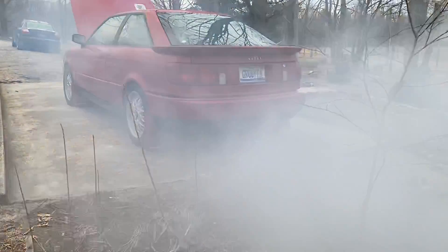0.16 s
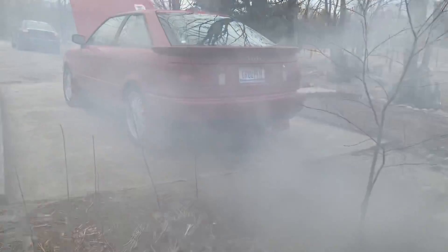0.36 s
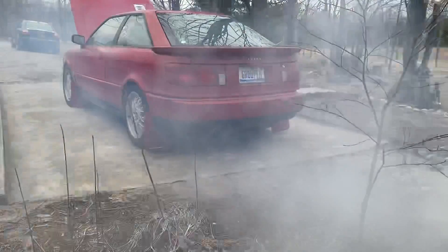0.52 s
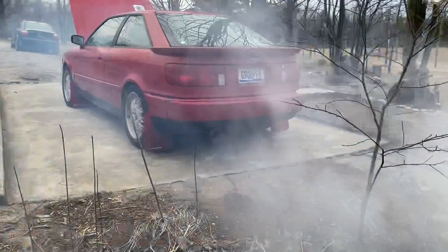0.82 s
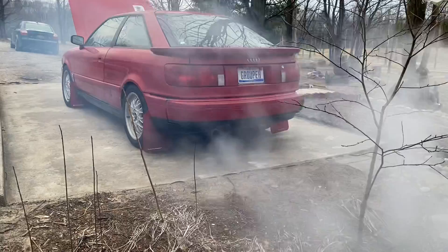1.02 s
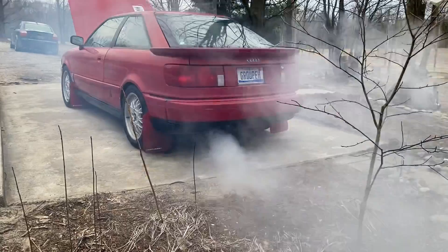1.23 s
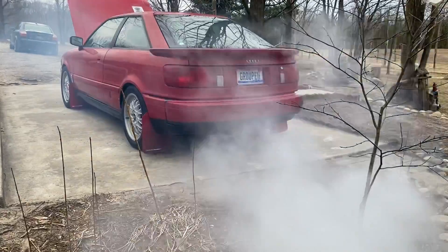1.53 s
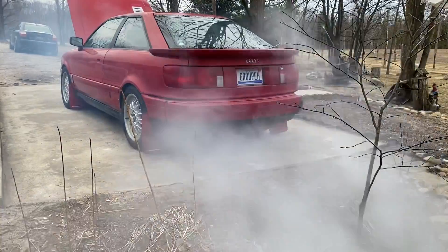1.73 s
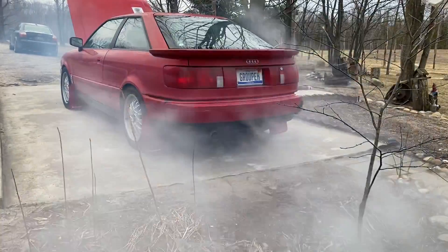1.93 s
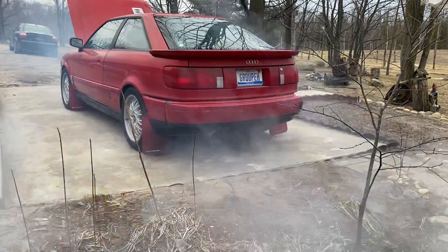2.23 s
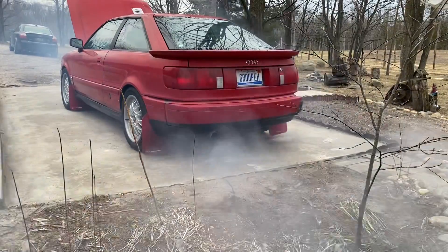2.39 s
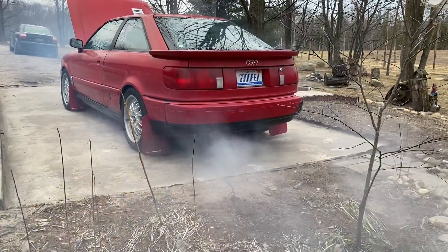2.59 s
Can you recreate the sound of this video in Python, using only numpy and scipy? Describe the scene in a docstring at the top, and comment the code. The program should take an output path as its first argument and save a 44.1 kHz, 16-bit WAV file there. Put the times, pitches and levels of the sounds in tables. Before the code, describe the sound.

Close behind a parked car's tailpipe outdoors, a deep droning exhaust climbs with a raspy edge, falls smoother and burbling, cracks sharply, climbs a second time and sinks away with soft pops and faint nearby reflections.

```python
"""A five-cylinder car is revved twice on a driveway, heard from a few metres behind its tailpipe.
The first rev climbs with a tone and a puff of noise per firing, then winds down with burbles and thuds.
The throttle reopens with a bang for a second rev, which climbs, burbles, thuds and winds down too.
The tones are sine waves; pulses and filtered noise make the bark, rasp, hiss, burble and cracks.
All along, the ground and nearby walls answer faintly."""
import sys
import numpy as np
from scipy import signal
from scipy.fft import rfft, irfft, next_fast_len
from scipy.io import wavfile
from scipy.ndimage import uniform_filter1d, map_coordinates

SR = 44100
rng = np.random.default_rng(int(sys.argv[2]) if len(sys.argv) > 2 else 0)


def transcribe(signal):
    """Save signal, clipped to [-1, 1], as a 16-bit WAV file at the path in sys.argv[1]."""
    frames = np.atleast_2d(signal).T
    limited = np.clip(frames, -1, 1)
    pcm = np.round(limited * 32767).astype(np.int16)
    wavfile.write(sys.argv[1], SR, pcm)


N = 121275

# how fast the engine fires, before a slight random wobble: time_s, firings_per_second
FIRING_RATE = [(0, 123.5), (.17, 137), (.34, 153.4), (.51, 168.4), (.6, 175), (.68, 176), (.85, 160),
               (1.02, 147), (1.32, 124), (1.4, 117), (1.53, 130.5), (1.7, 139), (1.87, 155), (2.04, 170.7),
               (2.11, 171), (2.21, 174), (2.38, 154.6), (2.75, 128.5)]
# relative strength of each cylinder's pulse, in firing order: strength_db (each use scales it)
CYLINDERS = [2.5, -3, 1.5, -.5, -2]


def amp(db):
    """Decibels to gain."""
    return 10 ** (np.asarray(db) / 20)


def unit(x):
    """Scale to an rms (average strength) of 1."""
    return x / np.sqrt(np.mean(x ** 2) + 1e-20)


def along(points, hz):
    """Read a value at each frequency from (Hz, value) points, on a log frequency axis."""
    point_hz, values = np.transpose(points)
    return np.interp(np.log(hz + 1), np.log(point_hz + 1), values)


def curve(rows):
    """Join (s, value) points with straight lines, giving one value per sample."""
    return np.interp(np.arange(N) / SR, *np.transpose(rows))


def wobble(rate):
    """A smooth random curve through `rate` random points a second."""
    knots = rng.standard_normal(int(N * rate / SR) + 4)
    return map_coordinates(knots, [np.arange(N) * rate / SR])


def filtered(x, response):
    """Multiply the spectrum of x by a response, which may be complex."""
    size = next_fast_len(N + SR // 2)
    hz = np.fft.rfftfreq(size, 1 / SR)
    return irfft(rfft(x, size) * response(hz), size)[..., :N]


def coloured(x, points):
    """Shape the tone of x by (Hz, dB) points, with a filter that never sounds ahead of its input."""
    size = 2 * next_fast_len(N)
    gain = amp(along(points, np.fft.rfftfreq(size, 1 / SR)))
    # fold the cepstrum (the spectrum of the log gain) onto positive time
    cepstrum = irfft(np.log(gain))
    cepstrum[1:size // 2] *= 2
    cepstrum[size // 2 + 1:] = 0
    return irfft(rfft(x, size) * np.exp(rfft(cepstrum)))[:N]


def firings():
    """Add up the slightly unsteady firing rate into a running count of firings."""
    return np.cumsum(curve(FIRING_RATE) * (1 + 0.0032 * wobble(35))) / SR


def sizes(turn, pattern, scatter_db):
    """Gain of each firing: its cylinder's strength, scaled by `pattern`, and some chance."""
    k = np.arange(int(turn[-1]) + 2)
    strength_db = pattern * np.array(CYLINDERS)[k % len(CYLINDERS)]
    return amp(strength_db + scatter_db * rng.standard_normal(len(k)))


def yard(x, early_s, tail_db):
    """Quick reflections from the ground and the car, then a faint tail from the walls."""
    # how long the walls' tail takes to fall by 60 dB: pitch_hz, fade_s
    tail_fade = [(100, 0.072), (1000, 0.26), (4000, 0.078), (12000, 0.027)]
    # strength of the reflected sound: pitch_hz, level_db
    scatter = [(60, -30), (150, -25), (300, -17.5), (600, -16.5), (1300, -8), (2500, -3.5), (6000, -4.5),
               (14000, 4.5)]
    # noise whose pitches each fade at their own speed
    hz, t, z = signal.stft(rng.standard_normal(SR // 2), SR, nperseg=256)
    fading = z * amp(-60 * t / along(tail_fade, hz)[:, None])
    tail = signal.istft(fading, SR, nperseg=256)[1]
    early_fade = amp(-60 * np.arange(len(tail)) / SR / early_s)
    early = rng.standard_normal(len(tail)) * early_fade
    answer = early / np.linalg.norm(early) + amp(tail_db) * tail / np.linalg.norm(tail)
    reflected = signal.fftconvolve(x, answer / np.linalg.norm(answer))[:N]
    return filtered(reflected, lambda f: amp(along(scatter, f)))


def hiss(turn, hiss_db, flutter):
    """Gas flow and engine bay noise, fluttering at the firing rate."""
    # hiss level before hiss_db is added: time_s, level_db
    hiss_level = [(0, -43), (.55, -40), (.76, -45), (.88, -39.5), (1.1, -42), (1.25, -53), (1.33, -49.5),
                  (2.05, -38), (2.27, -44.5), (2.39, -42), (2.62, -43), (2.75, -47)]
    # tone of the hiss: pitch_hz, level_db
    hiss_colour = [(30, -21.5), (70, 6.5), (300, 7.5), (900, 3.5), (1900, -3.5), (2250, -12.5), (2600, -3),
                   (3400, -10.5), (4600, -11.5), (5400, -9), (6100, -13), (7800, -14.5), (8900, -34),
                   (10000, -16.5), (12000, -25), (13200, -39.5), (15500, -37.5)]
    fluttering = rng.standard_normal(N) * (1 + flutter * np.cos(2 * np.pi * turn))
    return unit(coloured(fluttering, hiss_colour)) * amp(curve(hiss_level) + hiss_db)


def burble(lumpy_db):
    """Leftover fuel burns unevenly in the exhaust: low noise of lumpy strength swells and fades."""
    # spells of uneven burning: centre_s, width_s, level_db
    spells = [(.8, 0.05, -22.5), (1.363, 0.038, -20), (2.322, 0.046, -17.5)]
    # tone of the burble: pitch_hz, level_db
    burble_colour = [(25, -40.5), (45, -20), (65, -3), (95, -5), (135, 0.5), (170, -0.5), (208, 7.5),
                     (240, -7.5), (290, -13), (380, -7.5), (500, -21.5), (800, -17), (1400, -36),
                     (4000, -64.5)]
    t = np.arange(N) / SR
    level = sum(amp(db) * np.exp(-.5 * ((t - s) / width) ** 2) for s, width, db in spells)
    lumpy = rng.standard_normal(N) * amp(lumpy_db * wobble(130))
    return level * unit(coloured(lumpy, burble_colour))


def thuds(thud_db):
    """Afterfire inside: each dull pop sets the silencer ringing as a group of fading tones."""
    # dull pops in the silencer, before thud_db is added: start_s, level_db
    pops = [(.325, -27.5), (0.839, -19.5), (0.86, -16.5), (1.329, -8.5), (1.348, -15.5), (2.373, -15.5),
            (2.399, -16), (2.433, -18)]
    # the silencer's ring, each pitch slightly varied by chance: pitch_hz, level_db, 60 dB fade_s
    silencer = [(63.6, -20.5, 0.18), (99, -5, 0.031), (134, 10.5, 0.035), (190, -12, 0.017),
                (288, -7, 0.071), (456, -12.5, 0.019), (553, -7, 0.11), (820, -19.5, 0.017)]
    t = np.arange(N) / SR
    total = np.zeros(N)
    for start, pop_db in pops:
        since = np.maximum(t - start, 0)
        for hz, ring_db, fade in silencer:
            varied_hz = hz * (1 + 0.022 * rng.normal())
            total += amp(pop_db + ring_db - 60 * since / fade) * np.sin(2 * np.pi * varied_hz * since)
    return amp(thud_db) * total


def cracks(crack_db):
    """Afterfire outside: sharp cracks leave the pipe's mouth as sudden, quickly fading noise."""
    # cracks at the pipe's mouth, before crack_db is added: start_s, level_db, 60 dB fade_s
    bursts = [(0.0474, -25, .014), (.1945, -30, 0.029), (1.3267, -12.5, 0.042), (1.3563, -24.5, 0.019),
              (1.3754, -20.5, .02), (1.381, -26, 0.029), (1.959, -26, 0.018)]
    # tone of the cracks: pitch_hz, level_db
    crack_colour = [(100, -11.5), (400, 3), (560, -3), (680, 3), (850, 12.5), (1150, 2.5), (1450, -10),
                    (2000, 0.5), (2250, -10), (2600, -6), (3100, -10.5), (4700, -9), (6300, -25),
                    (7800, -20.5), (9000, -33.5), (11000, -22.5), (15500, -42)]
    t = np.arange(N) / SR
    blast = np.zeros(N)
    for start, db, fade in bursts:
        blast += (t >= start) * amp(db - 60 * np.maximum(t - start, 0) / fade)
    noise = rng.standard_normal(N)
    # dividing by the steady noise's strength keeps the colour from changing the level
    return amp(crack_db) * coloured(noise * blast, crack_colour) / coloured(noise, crack_colour).std()


def lope(turn, lope_db, waver_db):
    """Tones of the unequal cylinders swell as they glide through the silencer's resonances."""
    # tones, before lope_db is added: multiple of the engine cycle rate, level_db
    cycle_tones = [(2, -39.5), (3, -35), (4, -31.5), (6, -33.5), (7, -33.5), (8, -32), (9, -30),
                   (11, -35.5), (12, -33.5)]
    # the silencer's response to those tones: pitch_hz, level_db
    chambers = [(48, -6), (65, 1), (90, -3), (115, -4), (145, 5.5), (175, -8), (203, 6.5), (237, -10),
                (280, 1), (315, -11.5), (350, 3), (420, -11.5)]
    # one engine cycle fires every cylinder once
    cycle_hz, cycle = curve(FIRING_RATE) / len(CYLINDERS), turn / len(CYLINDERS)
    tones = np.zeros(N)
    for multiple, db in cycle_tones:
        k = round(multiple)
        level_db = db + along(chambers, k * cycle_hz) + waver_db * wobble(15)
        tones += amp(level_db) * np.sin(2 * np.pi * (k * cycle + rng.random()))
    return amp(lope_db) * tones


def puffs(turn, level_db, colour):
    """Each firing blows a short turbulent puff out of the pipe, slightly early or late."""
    drift = .05  # scatter of the timing, as a share of the firing period
    rise, fade = .025, 0.25  # time constants, as shares of the firing period
    bed = 0.11  # steady flow under the puffs, against a puff scale of 1
    drifted = np.clip(turn + drift * wobble(140), 0, turn[-1])
    since = drifted % 1
    shape = (1 - np.exp(-since / rise)) * np.exp(-since / fade)
    puff = shape * sizes(turn, pattern=.35, scatter_db=2.1)[drifted.astype(int)]
    jet = coloured((puff + bed) * rng.standard_normal(N), colour)
    return unit(jet) * amp(level_db)


def sizzle(turn):
    """The treble of the puffs, strong only under load."""
    # sizzle level: time_s, level_db
    sizzle_level = [(0, -34.5), (0.218, -37.5), (.29, -44.5), (0.419, -38.5), (.56, -40.5), (.64, -56),
                    (1.319, -74.5), (1.334, -36.5), (1.429, -36.5), (1.52, -43), (1.7, -39), (1.84, -40),
                    (1.982, -33.5), (2.07, -41.5), (2.151, -63), (2.75, -65.5)]
    # tone of the sizzle: pitch_hz, level_db
    sizzle_colour = [(500, -25.5), (2200, -17), (2900, -8.5), (3200, -3), (3500, -4.5), (3900, 2),
                     (4200, -11.5), (4550, -3.5), (5100, -20), (5450, -9), (6200, -19.5), (7900, -15.5),
                     (8900, -35), (10500, -16.5), (13000, -38), (15500, -49.5)]
    return puffs(turn, curve(sizzle_level), sizzle_colour)


def rasp(turn, rasp_db):
    """The rough middle of the puffs, one puff per firing."""
    # rasp level before rasp_db is added: time_s, level_db
    rasp_level = [(0, -27.5), (0.219, -31.5), (.33, -32), (.43, -31.5), (.55, -33.5), (.64, -40),
                  (0.831, -46), (.92, -48.5), (1.1, -49.5), (1.318, -58.5), (1.335, -29.5), (1.43, -30.5),
                  (1.601, -31.5), (1.82, -33), (2.0, -28.5), (2.159, -41.5), (2.3, -49.5), (2.381, -45.5),
                  (2.46, -51), (2.75, -53)]
    # tone of the rasp: pitch_hz, level_db
    rasp_colour = [(150, -47.5), (400, -1.5), (560, 3), (675, -7.5), (780, 5), (1090, -1), (1280, 7.5),
                   (1410, -10.5), (1570, 1.5), (1980, 3.5), (2120, -7), (2300, -13.5), (2530, 4),
                   (2730, -6), (2900, -17.5), (4000, -21), (6000, -37.5), (15500, -71.5)]
    return puffs(turn, curve(rasp_level) + rasp_db, rasp_colour)


def bark(turn, bark_db, scatter_db, jitter_s, even, rough, fade):
    """Unequal cylinder pulses, each trailed by turbulence, ring the pipe; falling revs are rougher."""
    # bark level before bark_db is added: time_s, level_db
    bark_level = [(0, -22), (.5, -21), (.8, -21), (.9, -29.5), (1.04, -27), (1.2, -34), (1.32, -41.5),
                  (1.37, -21.5), (1.9, -21), (2.14, -20), (2.27, -23.5), (2.41, -25.5), (2.46, -28.5),
                  (2.65, -30.5), (2.75, -31.5)]
    # tone of the exhaust pipe: pitch_hz, level_db
    pipe = [(30, -43.5), (62, -10.5), (100, -10.5), (150, -10), (205, -3.5), (238, -12.5), (280, 9),
            (330, 6), (400, 1.5), (465, 0.5), (550, 4.5), (620, 0.5), (675, -11), (765, 2), (880, -2),
            (1090, -12), (1270, -13.5), (1410, -24.5), (1900, -23.5), (3000, -47.5), (6000, -79)]
    coast_rough = 0.28  # extra share of turbulence while the revs fall
    k = np.arange(1, int(turn[-1]))
    at = np.interp(k, turn, np.arange(N)) + jitter_s * SR * rng.standard_normal(len(k))
    size = sizes(turn, 0.9, scatter_db)[k]
    # even = 1 keeps the whole pulse; less leaves more of the cylinders' differences
    height = size - (1 - even) * size.mean()
    pulses = np.bincount(np.clip(at, 0, N - 1).astype(int), height, N)
    churn = rng.standard_normal(N) * np.exp(-(turn % 1) / fade)
    falling = 1. * (np.gradient(curve(FIRING_RATE)) < 0)
    coasting = uniform_filter1d(falling, size=SR // 8)
    share = np.clip(rough + coast_rough * coasting, 0, 1)
    blow = np.sqrt(1 - share) * unit(pulses) + np.sqrt(share) * unit(churn)
    return unit(coloured(blow, pipe)) * amp(curve(bark_level) + bark_db)


def boom(turn, octave_db, third_db, shake_db):
    """The clean low tones: sine waves at one, two and three times the firing rate."""
    # level of the firing tone, before a random shake: time_s, level_db
    firing_level = [(0, -10), (.35, -11.5), (.52, -8.5), (.6, -14.5), (.72, -17), (.8, -25.5), (.85, -16),
                    (1.03, -11.7), (1.19, -14.5), (1.29, -27), (1.35, -26.5), (1.39, -15.5), (1.46, -9.5),
                    (1.9, -11.5), (2.01, -8.5), (2.12, -15), (2.24, -19.5), (2.34, -25), (2.42, -17),
                    (2.57, -11), (2.75, -17.5)]
    # shared level of the two upper tones, before octave_db or third_db is added: time_s, level_db
    upper_level = [(0, -19.5), (.2, -17), (.34, -34), (.41, -24), (.53, -22.5), (.6, -14), (.76, -25.5),
                   (.85, -33), (1.0, -39.5), (1.15, -23), (1.3, -30.5), (1.42, -20), (1.7, -18),
                   (1.88, -30.5), (2.04, -21.5), (2.14, -15.5), (2.3, -23), (2.41, -45), (2.6, -26.5),
                   (2.75, -24)]
    phase = 2 * np.pi * turn
    first = amp(curve(firing_level) + shake_db * wobble(60)) * np.sin(phase - .5)
    upper = amp(curve(upper_level) + 0.37 * wobble(60))
    octave = amp(octave_db) * np.cos(2 * phase + .5)
    third = amp(third_db) * np.cos(3 * phase)
    return np.sqrt(2) * (first + upper * (octave + third))


def scene():
    """The exhaust, a little to the right; the yard's reflections come mostly from the sides."""
    # left minus right level of the direct sound: pitch_hz, difference_db
    lean = [(60, 1.5), (200, 1), (380, -1), (700, -1), (1290, -7), (2380, 1), (4400, -7.5), (8120, -3),
            (15000, 9.5)]
    lag_s = 4.3e-5  # the left channel hears the pipe later
    wash_db = -8.5  # gain of the reflections common to both channels
    turn = firings()
    car = hiss(turn, hiss_db=2, flutter=0.14)
    car += burble(lumpy_db=2.5)
    car += thuds(thud_db=0.5) + cracks(crack_db=1.5)
    car += lope(turn, lope_db=2.5, waver_db=2.5)
    car += sizzle(turn) + rasp(turn, rasp_db=4)
    car += bark(turn, bark_db=1.5, scatter_db=1.04, jitter_s=.0001, even=0.5, rough=0.46, fade=.7)
    car += boom(turn, octave_db=0.4, third_db=-17, shake_db=1.0)
    # half of each left-right difference goes to each channel, with opposite signs
    side = np.array([[.5], [-.5]])
    direct = filtered(car, lambda f: amp(side * along(lean, f)) * np.exp(-2j * np.pi * f * side * lag_s))
    sides = 2 * side * yard(car, early_s=.02, tail_db=-6.5)
    middle = amp(wash_db) * yard(car, early_s=.05, tail_db=-1.5)
    return direct + sides + middle


def record(dry):
    """The microphone sheds the deepest bass, rounds off the highest peaks and stops at its band limit."""
    top_hz = 15900
    bass_cut = signal.butter(3, 48, "highpass", fs=SR, output="sos")
    thin = signal.sosfilt(bass_cut, dry)
    soft = thin / (1 + np.abs(thin / .93) ** 8) ** (1 / 8)  # peaks level off near .93
    return filtered(soft, lambda hz: hz < top_hz)


dry = scene()
out = record(dry)
transcribe(out)
```